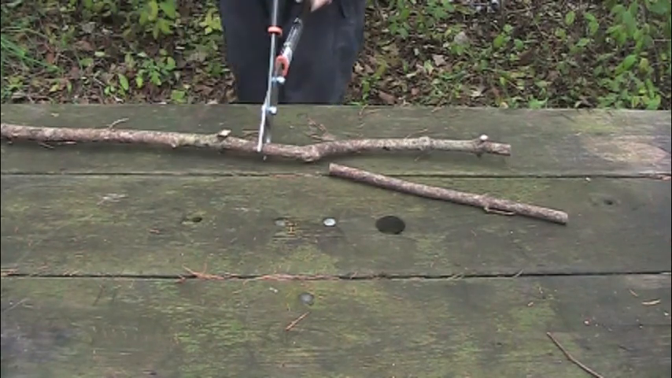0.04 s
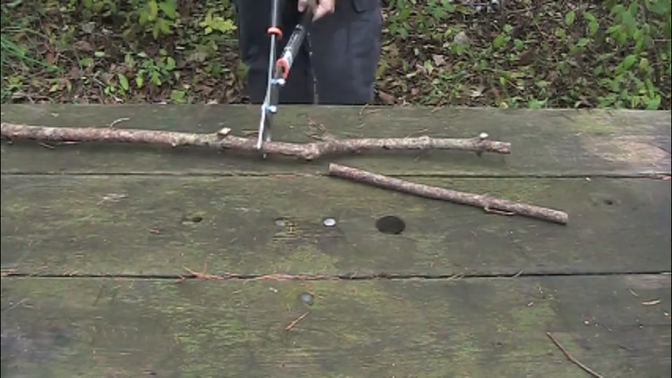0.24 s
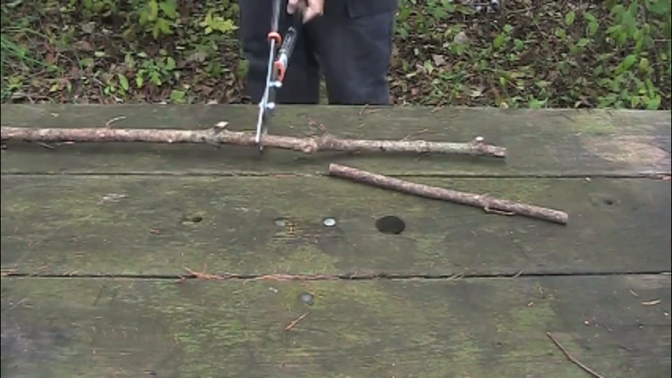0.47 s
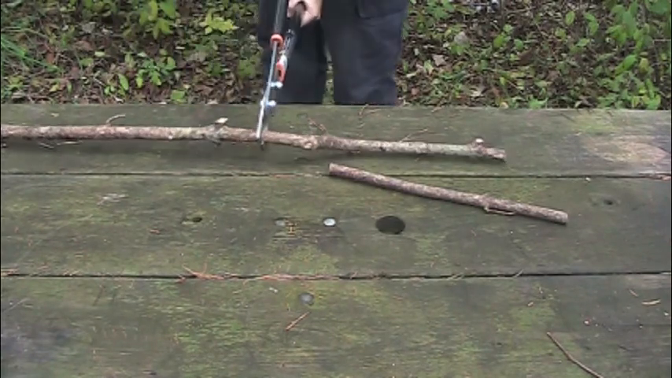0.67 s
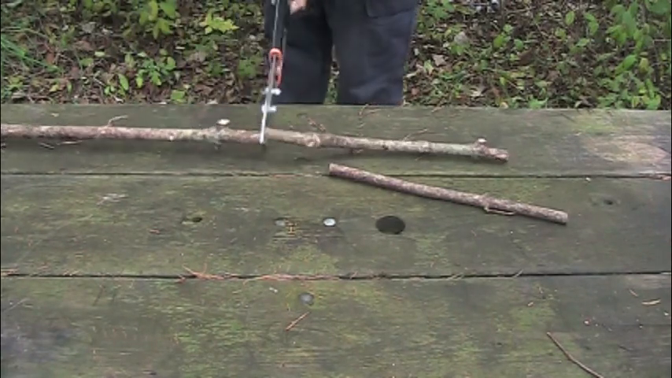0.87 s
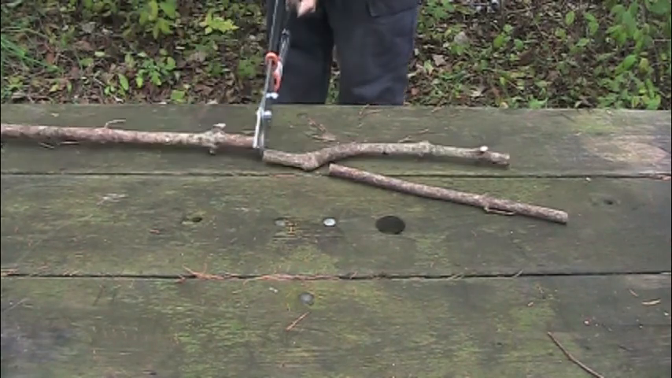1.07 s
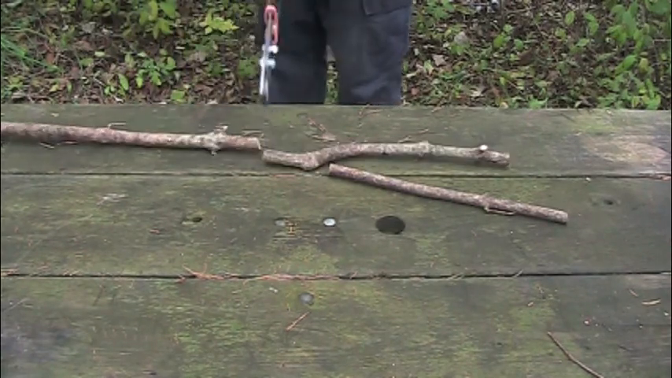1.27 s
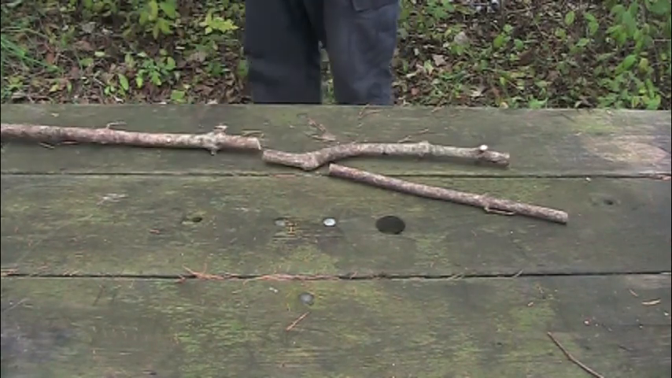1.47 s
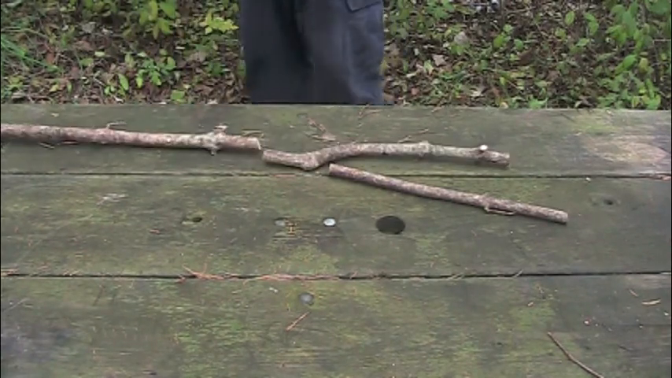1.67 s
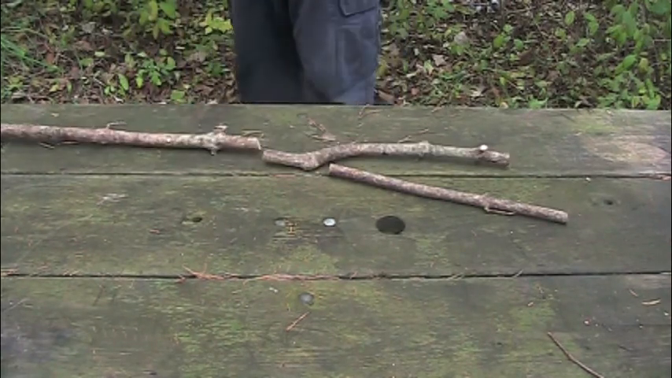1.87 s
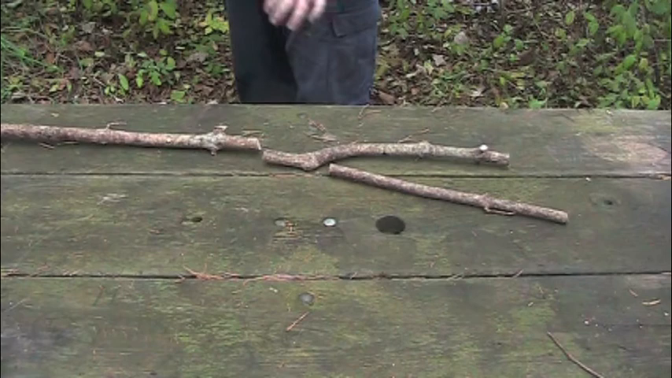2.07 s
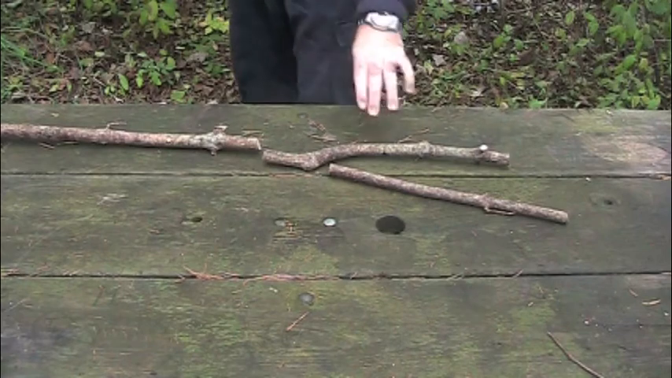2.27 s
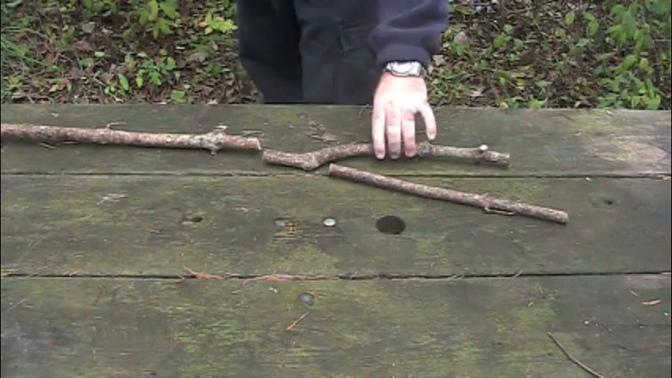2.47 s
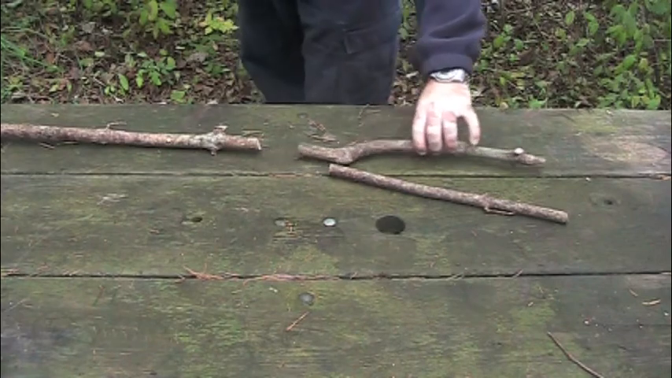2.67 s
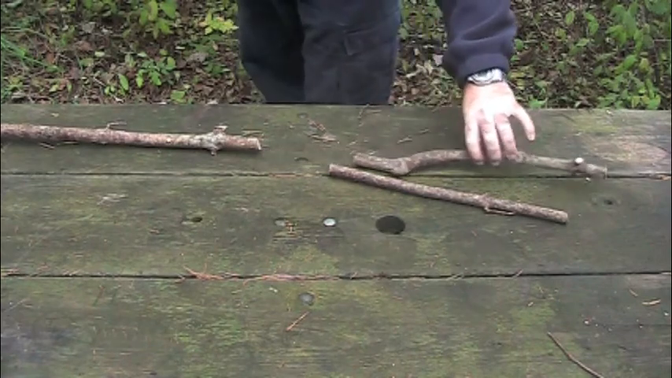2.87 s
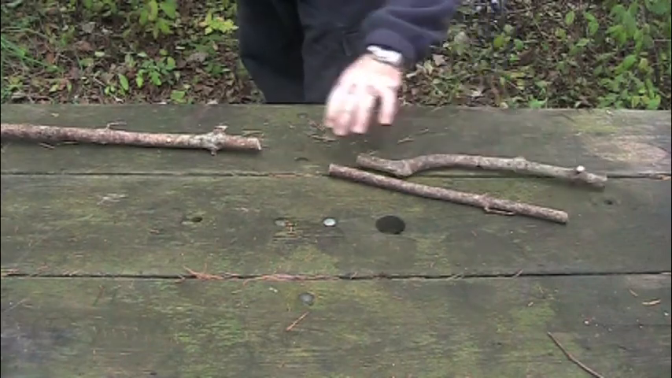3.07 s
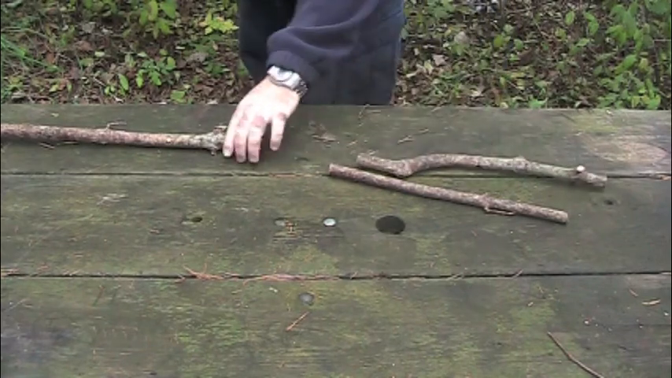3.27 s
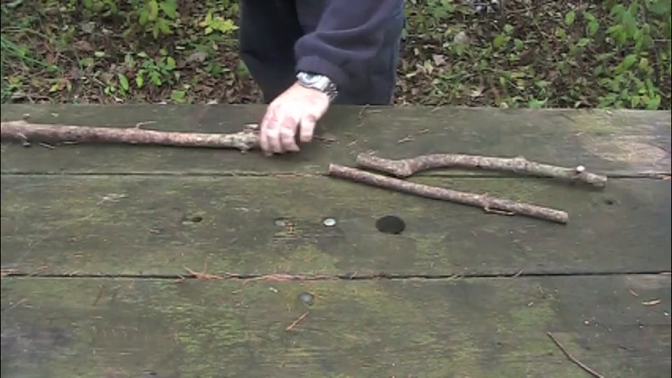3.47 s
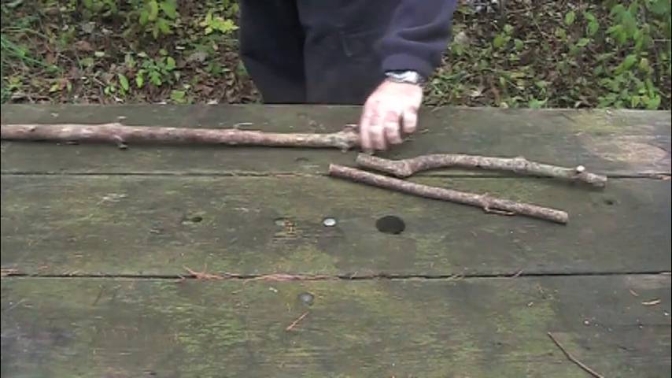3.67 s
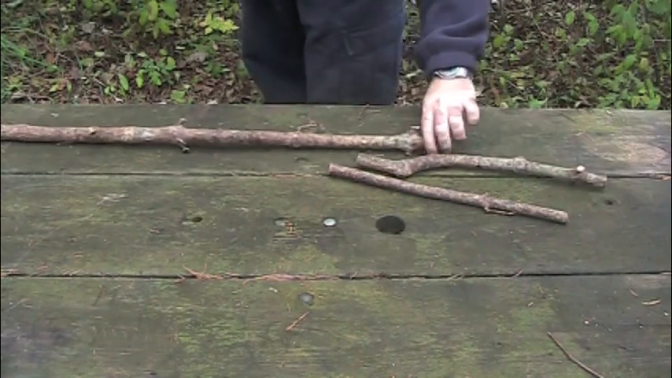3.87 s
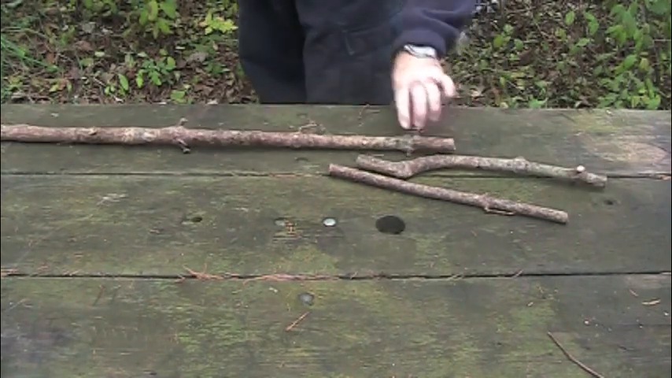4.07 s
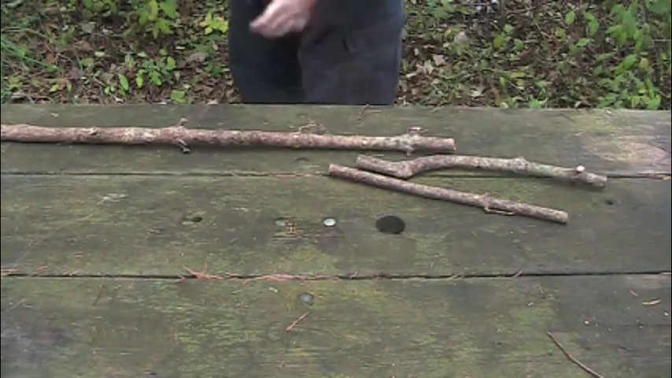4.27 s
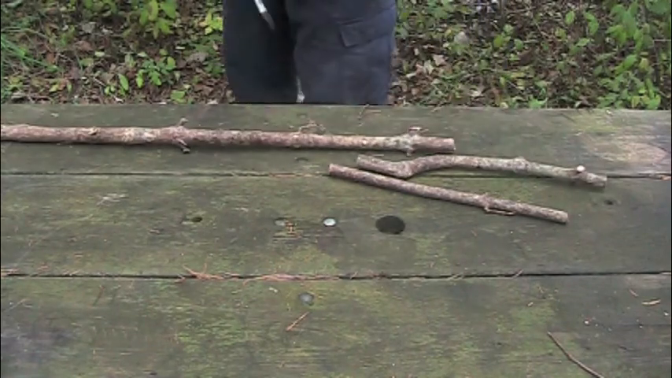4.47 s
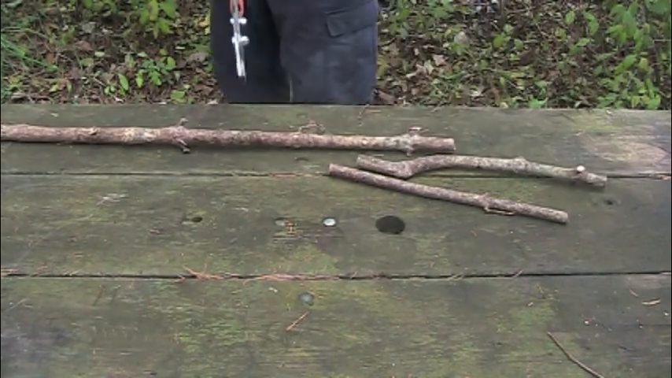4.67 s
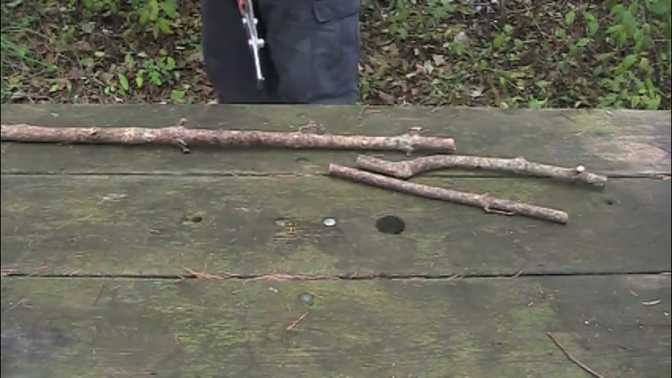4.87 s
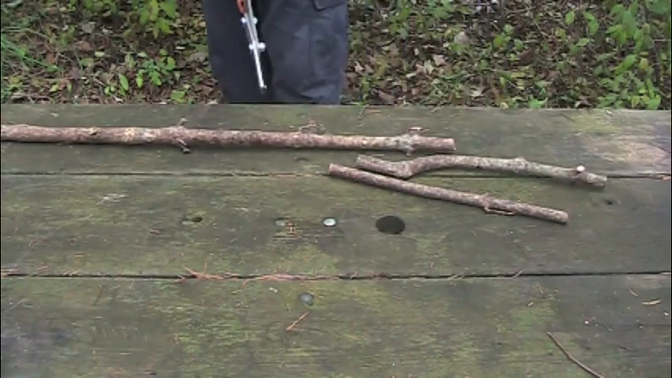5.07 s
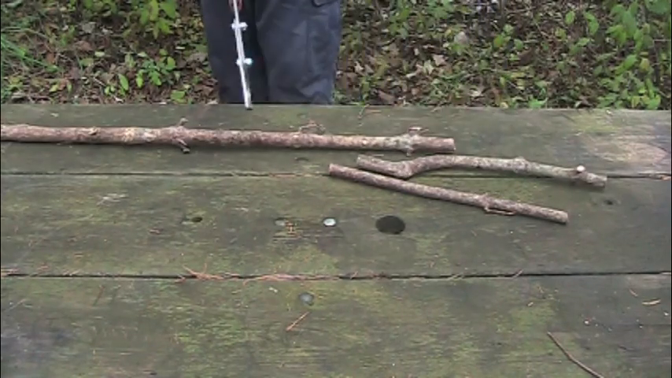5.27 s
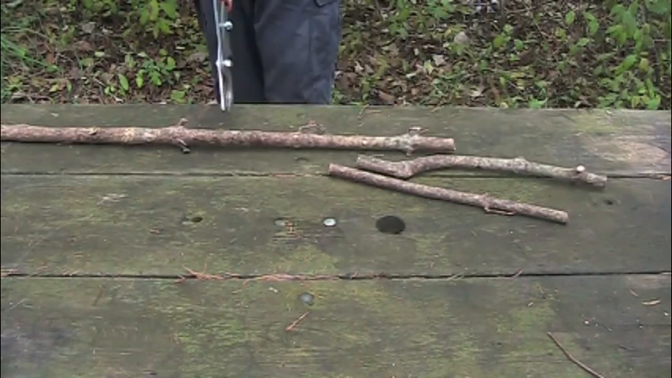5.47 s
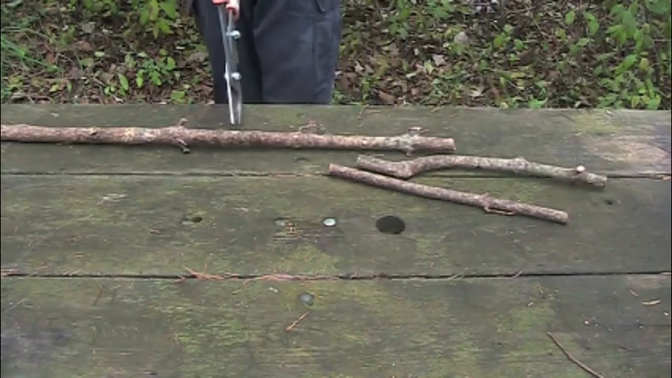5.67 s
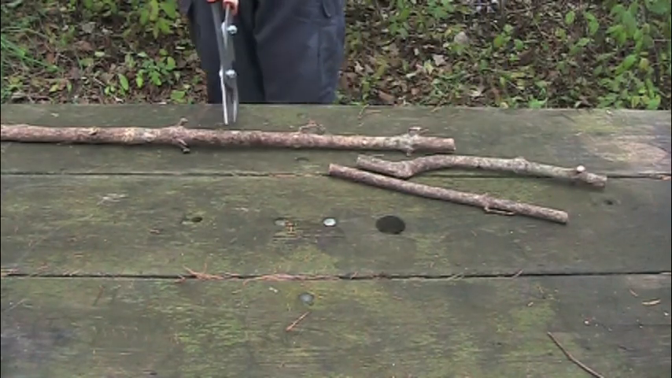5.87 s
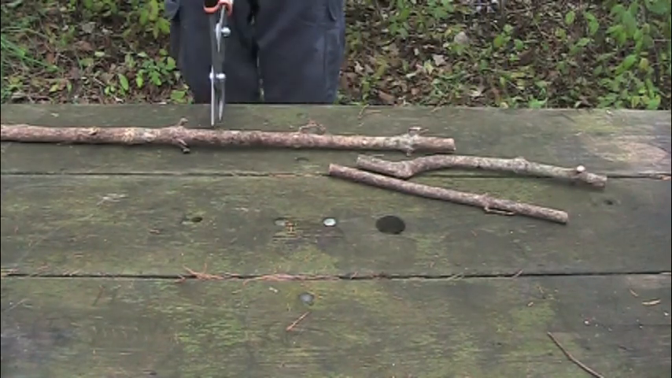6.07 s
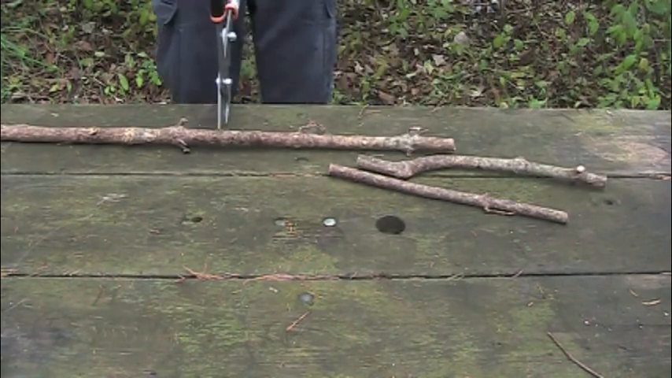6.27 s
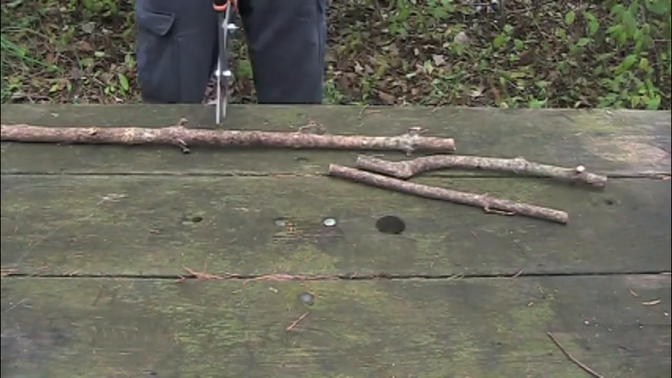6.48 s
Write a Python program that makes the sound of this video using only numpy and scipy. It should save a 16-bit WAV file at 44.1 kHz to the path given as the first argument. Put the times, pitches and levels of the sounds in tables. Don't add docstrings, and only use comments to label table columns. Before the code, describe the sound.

In a quiet garden, a stick crackles under a blade for almost a second, snaps abruptly, and drops with an overloaded wooden knock and rapid bounces. Light bumps and cloth rustles come after. Midway a hand sets the piece down with a firm clack, then bark scrapes over the boards. Finally loppers click lightly amid moving cloth. The near stereo microphone also catches a fine regular motor tick, distant traffic and a faint whine.

```python
import sys
import numpy as np
from scipy import signal
from scipy.io import wavfile

SR = 44100
rng = np.random.default_rng(int(sys.argv[2]) if len(sys.argv) > 2 else 0)


def digitize_waveform(pressure):
    field = np.atleast_2d(pressure).T
    bounded = np.clip(field, -1, 1)
    quanta = np.round(bounded * 32767).astype(np.int16)
    wavfile.write(sys.argv[1], SR, quanta)


def elevation(decibels):
    levels = np.asarray(decibels, float)
    return 10 ** (levels / 20)


N = 288400


def at_hz(points, hz):
    points = np.array(points)
    return np.interp(np.log(hz), np.log(points[:, 0]), points[:, 1])


def rms_one(x):
    return x / np.sqrt(np.mean(x ** 2) + 1e-20)


def drift(rate):
    r = np.exp(-80 * np.pi * rate / SR)
    slow = signal.lfilter([1], [1, -2 * r, r * r], rng.standard_normal(N // 40 + 2002))[2000:]
    return np.interp(np.arange(N) / 40, np.arange(len(slow)), rms_one(slow))


def ring(x, hz, t60):
    r, w = elevation(-60 / (max(t60, .001) * SR)), 2 * np.pi * hz / SR
    return signal.lfilter([0, np.sin(w)], [1, -2 * r * np.cos(w), r * r], x + 1e-18)


def band(x, low_hz, high_hz):
    sos = signal.butter(2, [low_hz, min(high_hz, .45 * SR)], "band", fs=SR, output="sos")
    return signal.sosfilt(sos, x)


def add(out, s, piece):
    i = round(s * SR)
    out[..., i:i + piece.shape[-1]] += piece[..., :N - i]


def panned(x, db):
    return x * elevation(np.multiply.outer([.5, -.5], db).reshape(2, -1))


def grains(size, share, spread_db):
    draw = rng.random((3, size))
    height = elevation(-spread_db * np.log(draw[1] + 0.0091))
    return rms_one((draw[0] < share) * height * np.sign(draw[2] - .5))


def strokes(rows, shifted=False):
    t = np.arange(0, N + 40, 40) / SR
    gain = 0
    for s, rise, fall, db, *more in rows:
        away = np.maximum((s - t) / rise, (t - s) / fall)
        gain = gain + elevation(db + shifted * sum(more) - 20 * away)
    return np.interp(np.arange(N) / SR, t, gain)


# f/Hz, likeness (1 = same, -1 = opposite)
LIKENESS = [(60, 1), (180, -0.12), (550, 0.0092), (1650, -0.46), (4970, -0.26), (15000, -0.36)]


def coloured(white, spectrum, slow_db, patchy_db, alike=None):
    out, together = 0, drift(5.7)
    lowest, highest = spectrum[0][0], spectrum[-1][0]
    edges = lowest * 2 ** np.arange(0, np.log2(highest / lowest) + .5, .5)
    for k, (low, high) in enumerate(zip(edges, edges[1:])):
        mid, side = band(white[k % 2], low, high)
        hz = np.sqrt(low * high)
        c = np.clip(at_hz(LIKENESS, hz) if alike is None else alike, -1, 1)
        gain = elevation(at_hz(spectrum, hz) + slow_db * together + patchy_db * drift(25))
        out = out + gain * (np.sqrt(1 + c) * mid + np.sqrt(1 - c) * side * [[1], [-1]])
    return rms_one(out)


def split(slips, modes):
    s, db = np.transpose(slips)
    luck, out = rng.normal(0, 1, (len(s), len(modes))), np.zeros(N)
    start = round(s[0] * SR)
    for k, (hz, level, t60) in enumerate(modes):
        hits = np.zeros(4000)
        hits[np.round(s * SR).astype(int) - start] = elevation(db + level - 8.5 + 2.5 * luck[:, k]) * (-1) ** k
        add(out, s[0], ring(hits, hz, t60))
    return panned(np.array([out, np.roll(out, 1)]), -3.0)


# t/s, level/dB
FIRST_SPLIT = [(.8734, -11.5), (.8742, -14), (.8752, -12.5), (.8764, -20), (.8778, -17), (.8790, -23)]
SECOND_SPLIT = [(.8997, -23.5), (.9010, -22.5), (.9022, -16), (.9032, -18), (.9052, -24.5), (.9075, -25.5),
                (.9095, -30)]
# f/Hz, level/dB, t60/s
FIRST_HALF = [(1190, -13, 0.059), (1360, -10.5, .03), (1770, -5.5, .015), (2165, -2, .025),
              (2530, -1.5, .018), (2820, -5.5, .015), (3260, -3.5, 0.023), (3703, -2, .015),
              (4020, -3, 0.013), (4607, -3, .018), (5730, -12, .016), (6730, -4, .018),
              (7150, -11.5, 0.021), (8630, -10, 0.012)]
SECOND_HALF = [(990, -5, .02), (1300, -4.5, .03), (1610, -1.5, .04), (2102, -8, .012), (2650, -2.5, .022),
               (3010, -9.5, .02), (3720, 2, .014), (4200, -10.5, .012), (5000, -11, .01),
               (5850, -12.5, .012), (6340, -14, .02), (6800, -16.5, .012), (7300, -11.5, 0.023),
               (8580, -15.5, .01)]


def main_splits():
    return split(FIRST_SPLIT, FIRST_HALF) + split(SECOND_SPLIT, SECOND_HALF)


# t/s, peak level/dB, burst length/s,
# brightest f/Hz, fall/(dB per octave squared)
BITES = [(.2945, -56, .006, 4000, 4), (.314, -48, .006, 6000, 8), (0.3602, -26, 0.0086, 4600, 36),
         (.3628, -49, .007, 4000, 5), (0.3722, -39.5, .005, 4500, -1), (.397, -50, .008, 4300, 8),
         (.4525, -45, 0.0081, 5000, -5), (0.533, -68, 0.0038, 3000, -3), (0.628, -41, 0.0075, 6043, 17),
         (0.6502, -45, .008, 4040, 8), (.671, -47.5, 0.0059, 5000, 11), (0.6798, -35.5, 0.0073, 4960, 8.5),
         (0.7063, -35.5, 0.0063, 4700, 11.5), (0.721, -48, 0.0054, 3820, 5.5),
         (0.742, -44.5, 0.0034, 6000, 5.5), (.765, -45, 0.0068, 4770, 4.5), (.801, -45, .005, 5800, 4),
         (.7908, -39.5, 0.0066, 4525, 5.5), (0.812, -31, 0.005, 3810, 9), (0.831, -37.5, .01, 4498, 8),
         (0.845, -40, 0.03, 3520, 11), (0.8671, -21, 0.01, 5000, -1), (0.873, -16, 0.011, 3014, 1.5),
         (0.8993, -17, .005, 5930, 2), (0.9, -23, 0.009, 3000, 1.5), (0.906, -30.5, 0.014, 1490, 9),
         (0.9294, -17.5, .008, 2000, 6), (1.067, -43.5, 0.0047, 4000, 15), (1.073, -38, 0.0069, 5000, 3),
         (2.9344, -52, .006, 3500, -1), (2.945, -55, 0.0033, 5000, 8), (5.1324, -40, 0.0047, 3800, 1.5),
         (5.144, -38.5, .006, 3840, 15), (5.149, -64, .006, 3000, 7), (5.16, -49, .006, 3800, 6)]
# f/Hz, level/dB, t60/s
BLADE = [(750, -12.5, 0.012), (1216, -9, 0.013), (1581, -10.5, 0.077), (2030, -5.5, 0.0069),
         (2606, -0.5, 0.011), (3290, 5.5, 0.0078), (3750, -3, 0.017), (4150, -2.5, 0.0083),
         (4600, -11, 0.005), (5700, -16, 0.0036), (6350, 6, 0.006), (7800, -22, 0.01), (8916, -21.5, 0.015),
         (13700, -13.5, .006)]


def bites():
    out, t = np.zeros((2, N)), np.arange(2600) / SR
    for s, db, length, top_hz, fall_db in BITES:
        shape = np.minimum(t / .0006, 1) * (elevation(-30 * (t / length) ** 1.5) + elevation(-28 - 500 * t))
        swarm = grains(len(t), .25, 3.0) * shape
        stray = grains(len(t), .25, 3.0) * shape * [[1], [-1]]
        piece = 0
        for (hz, level, t60), luck in zip(BLADE, rng.normal(0, 1, len(BLADE))):
            strength = elevation(level / 2 - abs(fall_db) * np.log2(hz / top_hz) ** 2 + 1.5 * luck)
            width = min(hz / 11894, .7)
            piece = piece + strength * ring(swarm + width * stray, hz, t60)
        piece = panned(band(piece, 550, 18000), -2.2)
        add(out, s, elevation(db) * piece / np.abs(piece.mean(axis=0)).max())
    return out


# t/s, peak level/dB
FIBRES = [(0.2578, -42.5), (0.274, -43.5), (0.285, -35), (.368, -42.5), (0.371, -34.5), (0.396, -45),
          (0.417, -37), (0.43, -39), (0.442, -38), (0.4519, -34.5), (0.491, -42.5), (0.587, -54),
          (0.621, -41.5), (0.6273, -34.5), (0.64, -39.5), (0.651, -49.5), (0.6704, -45.5), (0.6804, -41.5),
          (.686, -46.5), (.706, -41), (0.741, -44.5), (6.2137, -59)]


def fibres():
    snaps = np.zeros(N)
    for s, db in FIBRES:
        gap = np.zeros(rng.integers(3, 14))
        add(snaps, s + 0.0014, elevation(db + 7.5) * np.r_[1, gap, -.4])
    return panned(band(band(snaps, 7000, 19000), 5300, 17000), -0.4)


# peak t/s, rise/s, fall/s, level/dB
CREAK = [(.41, 0.053, 0.078, -54), (.32, .1, 0.069, -74), (.7, 0.14, 0.2, -62), (.83, 0.17, .12, -55),
         (.864, .07, .012, -47), (.885, 0.03, 0.078, -45), (.98, .02, 0.33, -74.5)]


def creak():
    crackle = grains(N, .09, 3.6)
    rung = 0
    for k, (hz, db, t60) in enumerate(BLADE[3:]):
        tone = elevation(db) * ring(crackle, hz, .5 * t60)
        rung = rung + panned(tone, 2.1 * (-1) ** k - 2.2)
    rasp = 1.8 * rms_one(band(crackle, 2900, 4800)) + 0.37 * rms_one(band(crackle, 6000, 7200))
    return strokes(CREAK) * rms_one(rms_one(rung) + rasp)


# f/Hz, level/dB, t60/s
RATTLE = [(312, -6.5, 0.32), (595, -10.5, 0.21), (1230, -15.5, 0.18), (2400, -40.5, 0.02),
          (4760, -27.5, 0.092), (9120, -38, .05)]


def knocks(blows, modes, uneven_db, rattle_db, rattle_length):
    out, t = np.zeros((2, N)), np.arange(13000) / SR
    for s, db, contact_ms in blows:
        push = t * t * np.exp(-1000 * t / contact_ms)
        luck = uneven_db * rng.normal(0, 1, len(modes))
        body = sum(elevation(level + a) * ring(push, hz, min(t60, .5)) for (hz, level, t60), a in zip(modes, luck))
        body = band(band(body, 220, 7600), 130, 9000)
        noise = rng.standard_normal((2, len(t))) * np.minimum(t / 0.00018, 1)
        noise = noise[0] + 0.14 * noise[1] * np.array([[1], [-1]])
        rattle = 0
        for hz, level, t60 in RATTLE:
            softer = 1 / (1 + (hz * contact_ms / 280) ** 2)
            fade = elevation(level - 60 * t / t60 / rattle_length)
            rattle = rattle + fade * softer * rms_one(band(noise, hz / 1.7, hz * 1.3))
        add(out, s, elevation(db) * (body / np.abs(body).max() + elevation(rattle_db) * rattle))
    return panned(out, -3.5)


# t/s, peak level/dB, contact/ms
DROPS = [
    (.922, -29, 0.4),
    (.9296, 2.5, 0.22),
    (.937, -20.5, .1),
    (.9445, -22.5, 0.11),
    (.9537, -12.5, 0.3),
    (.978, -24.5, 0.35),
]
FLAT_LANDING = [(.9301, -2.5, 0.43)]
# f/Hz, level/dB, t60/s
PLANK_MIDDLE = [(390, -17.5, 0.085), (391, 5.5, 0.03), (432.8, -13.5, .1), (517, -3, 0.08),
                (600, -12, 0.059), (655, -20.5, 0.13), (754, -17, 0.13), (791, -20.5, 0.074),
                (872, -23.5, 0.047), (980, -31, .06), (1094, -8.5, 0.07), (1620, -17.5, 0.045),
                (1902, -19.5, .03), (2210, -21.5, .03)]
PLANK_LOW = [(133, -21.5, .2), (167, -9.5, 0.06), (196, 1.5, .03), (197.4, -13.5, 0.27), (257, -14.5, 0.24),
             (305, -17.5, .14), (366, -16.5, 0.2), (442, -15.5, .06)]


def cut_end_drops():
    hard = knocks(DROPS, PLANK_MIDDLE, uneven_db=1.2, rattle_db=-9.0, rattle_length=0.53)
    return hard + knocks(FLAT_LANDING, PLANK_LOW, uneven_db=1.5, rattle_db=-18.5, rattle_length=.6)


# t/s, peak level/dB, contact/ms
REBOUND = [(1.0886, -21.5, 0.27)]
# f/Hz, level/dB, t60/s
PLANK_REBOUND = [(203, 7.5, 0.12), (252, -4, 0.4), (380, -20, 0.36), (440, 3.5, 0.035), (515, 3, 0.041),
                 (600, 0.5, 0.076), (720, -17, 0.064), (920, -6, 0.054), (1160, 2, .04), (1400, -2, .04)]


def rebound():
    return knocks(REBOUND, PLANK_REBOUND, uneven_db=1.2, rattle_db=-13.0, rattle_length=0.8)


# t/s, peak level/dB, contact/ms
SET_DOWN = [(2.845, -59, 0.67), (2.885, -46.5, 0.61), (2.9335, -33.5, 0.46), (2.9457, -8.5, 0.34),
            (2.962, -43, 0.22), (2.991, -28, 0.5), (3.028, -34.5, 1)]
# f/Hz, level/dB, t60/s
PLANK_END = [(148.7, -11, 0.48), (221, -36, 0.2), (253.7, -9, 0.23), (319.6, -16, 0.31), (384, -18, 0.24),
             (425, -11, 0.13), (527, 1.5, 0.17), (609, 2.5, 0.07), (697, -0.5, 0.096), (756, -2, 0.043),
             (1250, -1, 0.079), (1400, 15, 0.032), (1700, 10, 0.037), (2000, 12.5, 0.048)]


def set_down():
    return knocks(SET_DOWN, PLANK_END, uneven_db=1.2, rattle_db=-9.0, rattle_length=0.34)


# t/s, peak level/dB, contact/ms
NUDGES = [(.43, -50, 0.54), (.455, -42, 0.099), (.668, -42.5, 0.43), (1.020, -29.5, 0.8),
          (1.0905, -23, 0.67), (1.1955, -33, 0.75), (1.205, -38, 0.3), (1.24, -37.5, 1),
          (1.367, -46.5, 0.59), (3.935, -47, 0.51)]
# f/Hz, level/dB, t60/s
PLANK_WHOLE = [(166, -3, .2), (203, 0.5, .22), (260, -7.5, 0.17), (306.3, -9.5, 0.082), (382, -10.5, 0.079),
               (485.7, -10.5, 0.083)]


def nudges():
    return knocks(NUDGES, PLANK_WHOLE, uneven_db=1.2, rattle_db=-7.5, rattle_length=0.54)


# t/s, peak level/dB, f/Hz, length/s, left-right/dB
CLICKS = [(1.0885, -35.5, 910, 0.031, -3), (2.888, -63, 1320, 0.009, 2), (2.991, -62, 1510, .008, 13),
          (5.134, -30, 1190, 0.011, -3), (5.146, -29.5, 1070, 0.02, -3), (5.148, -41.5, 1580, 0.042, 3.5),
          (5.282, -36.5, 1400, 0.0045, -2), (5.475, -51, 1300, .015, -0.5), (5.74, -45, 1300, 0.028, -4.5)]


def clicks():
    out, t = np.zeros((2, N)), np.arange(3000) / SR
    for s, db, hz, length, pan_db in CLICKS:
        swarm = (grains(len(t), 0.26, 0.58) + 1.2 * (t == 0)) * elevation(-30 * t / length)
        piece = ring(swarm, hz, .014) + .9 * ring(swarm, .45 * hz, .012) + .4 * ring(swarm, 1.4 * hz, .008)
        piece = piece + .3 * ring(swarm, 2.5 * hz, .005) + .2 * ring(swarm, 3.5 * hz, .004)
        piece = band(piece, 650, 7400)
        add(out, s, panned(elevation(db - 4.5) * piece / np.abs(piece).max(), pan_db))
    return out


# peak t/s, rise/s, fall/s, level/dB, scratch above rumble/dB
RUBBING = [(.34, 0.078, 0.19, -59, -5.5), (.44, 0.19, 0.076, -61.5, 9), (.68, 0.044, 0.53, -63.5, -5),
           (0.864, 0.098, 0.051, -50, 2), (1.14, .03, 0.16, -46.5, -14), (1.21, 0.067, 0.29, -58, -18.5),
           (1.372, 0.029, 0.098, -68.5, -7), (2.895, 0.065, 0.068, -49, -10.5),
           (3.53, 0.28, 0.18, -64, -1.5), (3.645, 0.18, 0.13, -53, -0.5), (3.706, 0.17, 0.16, -55, 3),
           (3.79, 0.087, 0.08, -78, 5), (3.95, 0.014, 0.12, -64, -11.5), (4.06, 0.045, 0.0087, -61, -7)]
# f/Hz, level/dB, t60/s
DRAG_RUMBLE = [(163.3, -1, 0.09), (208, -3, .12), (232, 0.5, .1), (250, -4.5, .1), (392, -7, .08)]
DRAG_SCRATCH = [(431.1, -0.5, 0.058), (495, -1.5, .05), (554.4, -3, 0.042), (633, -7.5, 0.054),
                (790, -7.5, .03), (905, -8, 0.04), (1160, -6, 0.045), (1494, -9.5, 0.021),
                (1620, -11, 0.034), (1940, -10.5, 0.012), (2250, -11, .02), (2700, -10, .015)]


def rubbing():
    bark = grains(N, .1, 2.5) * elevation(drift(30))

    def rung(modes):
        return rms_one(sum(elevation(db) * ring(bark, hz, t60) * (-1) ** k for k, (hz, db, t60) in enumerate(modes)))

    rumble = rms_one(band(rung(DRAG_RUMBLE), 140, 600))
    scratch = rms_one(band(rung(DRAG_SCRATCH), 350, 3500))
    return panned(strokes(RUBBING) * rumble + strokes(RUBBING, shifted=True) * scratch, -1.7)


# peak t/s, rise/s, fall/s, level/dB, brightness/dB
RUSTLE = [(0.001, 0.015, 0.067, -62.5, -10), (.11, 0.05, 0.95, -67.5, -5.5),
          (.324, 0.22, 0.57, -57.5, -3.5), (1.576, 0.027, 0.076, -61.5, -3), (1.63, 0.09, 0.018, -68, 5),
          (1.76, 0.27, 0.087, -72, 8), (1.81, 0.37, 0.016, -76, 13.5), (2.5, 0.7, 0.88, -74.5, 1),
          (2.02, 0.044, 0.027, -49.5, -7), (2.07, 0.28, 0.34, -66, -5), (3.518, 0.1, 0.059, -70, 2),
          (3.68, 0.36, 0.27, -65, 5), (4.048, 0.015, 0.019, -61, -8), (4.4, 0.22, 0.5, -64.5, -10),
          (4.642, 0.18, 0.21, -75, 15.5), (5.0, 0.27, 0.38, -59, 0), (5.15, 0.085, 0.013, -50.5, -16),
          (5.195, 0.16, 0.016, -65, -1), (5.5, 0.066, 0.14, -61.5, -8), (5.858, 0.018, 0.028, -87.5, 18.5),
          (6.0, 0.21, 0.67, -63.5, -3.5), (6.29, 0.12, 0.92, -54, -3.5), (6.43, 0.48, 0.027, -64, -21),
          (6.539, 0.037, 0.029, -78.5, -43)]
# f/Hz, level/dB (per Hz)
DULL = [(240, -45), (400, -10), (1000, -4.5), (1260, -5.5), (1380, -5), (2750, -8.5), (6000, -16.5),
        (7800, -47.5), (13200, -120)]
BRIGHT = [(1470, -37.5), (2500, -3.5), (4580, -1.5), (5480, -8), (6700, 5), (8140, -0.5), (13900, -6.5),
          (16000, 1)]


def rustle():
    def cloth(share):
        return np.array([grains(N, share, 3.0) for _ in range(4)]).reshape(2, 2, N)

    dull = coloured(cloth(0.27), DULL, 0, 0.94, alike=0.88)
    bright = coloured(cloth(0.1), BRIGHT, 0, 0.96, alike=0.41)
    return panned(strokes(RUSTLE) * dull + strokes(RUSTLE, shifted=True) * bright, -1.8)


TICK_FIELDS = (0, 3, 5, 7)
# f/Hz, level/dB, t60/s
LENS = [(4150, -62, 0.014), (3940, -60.5, 0.012)]


def lens_drive():
    field_s = 1.001 / 60
    fields = np.array([f for f in range(int(N / SR / field_s)) if f % 9 in TICK_FIELDS])
    ticks = np.zeros(N)
    ticks[np.round(fields * field_s * SR).astype(int)] = elevation(2.2 * rng.standard_normal(len(fields)))
    tones = sum(elevation(db) * ring(ticks, hz, t60) for hz, db, t60 in LENS)
    return panned(band(tones, 3400, 4700), -5.0)


# f/Hz, level/dB
AIR = [(12, -70), (20, -28.5), (39, -12), (65, -4), (127, -7.5), (228, -14), (255, -12), (542, -14.5),
       (897, -17.5), (1960, -22.5), (2820, -28), (3840, -27), (4670, -31.5), (13900, -40.5), (16000, -51)]
# t/s, rumble level/dB
TRAFFIC = [(0, 4), (0.501, 1.5), (2.2, -2.5), (3.999, 1.5), (5.2, -1.5), (5.8, 1), (6.54, -0.5)]
# peak t/s, rise/s, fall/s, level/dB
WHINE = [(2.32, 0.26, 0.64, -70), (2.79, 0.81, 0.043, -69)]


def background():
    air = elevation(-55.5) * coloured(rng.standard_normal((2, 2, N)), AIR, slow_db=0.06, patchy_db=2.3)
    low = signal.sosfilt(signal.butter(1, 150, fs=SR, output="sos"), air)
    swell = elevation(np.interp(np.arange(N) / SR, *np.transpose(TRAFFIC)))
    air = air - low + panned(low * swell, -3.5)
    whine_hz = 1940
    whine = rms_one(ring(ring(rng.standard_normal((2, N)), whine_hz, .007), whine_hz, .007))
    return air + strokes(WHINE) * whine


def scene():
    near = bites() + cut_end_drops() + rebound() + set_down() + nudges() + clicks()
    scatter = rng.standard_normal((2, 13000)) * elevation(-57.5 - 200 * np.arange(13000) / SR)
    yard = signal.fftconvolve(near, band(scatter, 280, 8000), axes=1)[:, :N]
    handling = fibres() + creak() + rubbing() + rustle()
    return main_splits() + near + yard + handling + lens_drive() + background()


def roll_off(x):
    return signal.sosfilt(signal.butter(12, 16680, fs=SR, output="sos"), x)


def record(dry):
    top, knee = .96, 4
    mix = dry / (1 + np.abs(dry / top) ** knee) ** (1 / knee)
    return roll_off(mix)


dry = scene()
out = record(dry)
digitize_waveform(out)
```